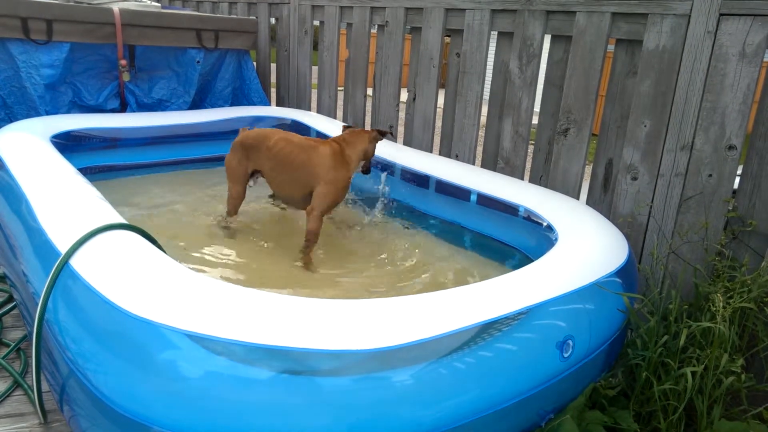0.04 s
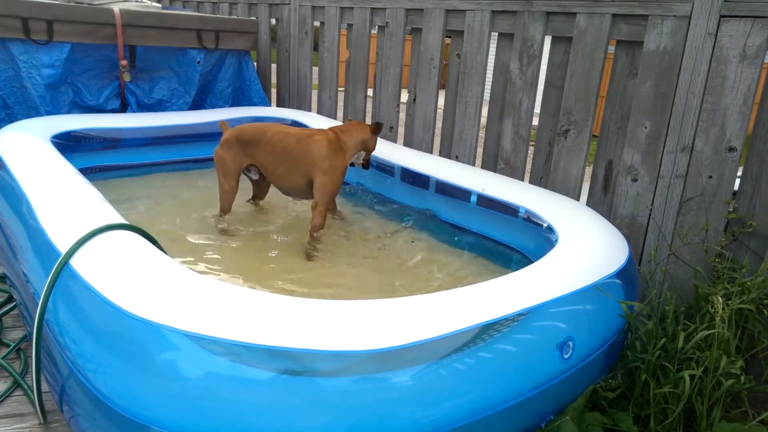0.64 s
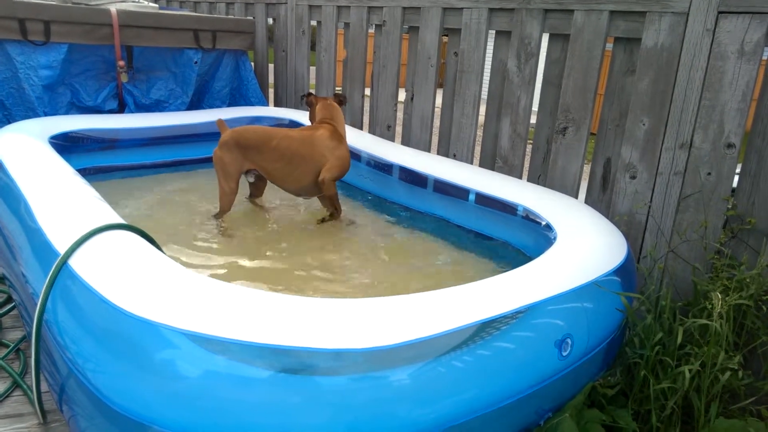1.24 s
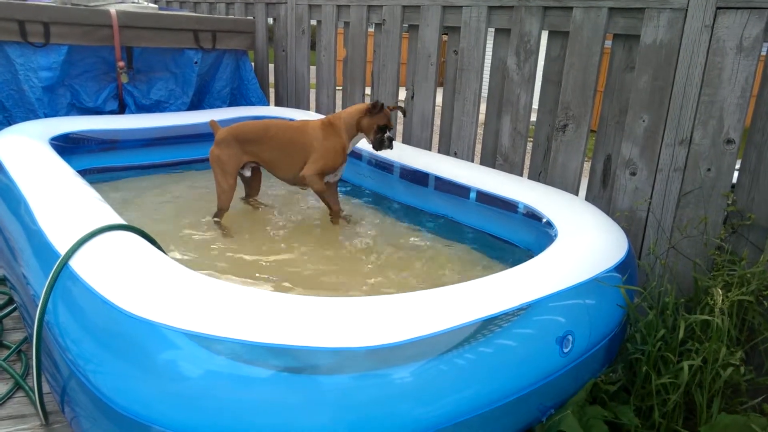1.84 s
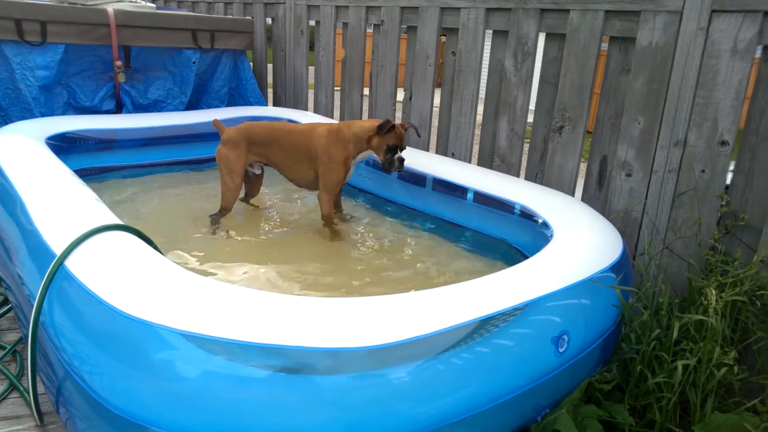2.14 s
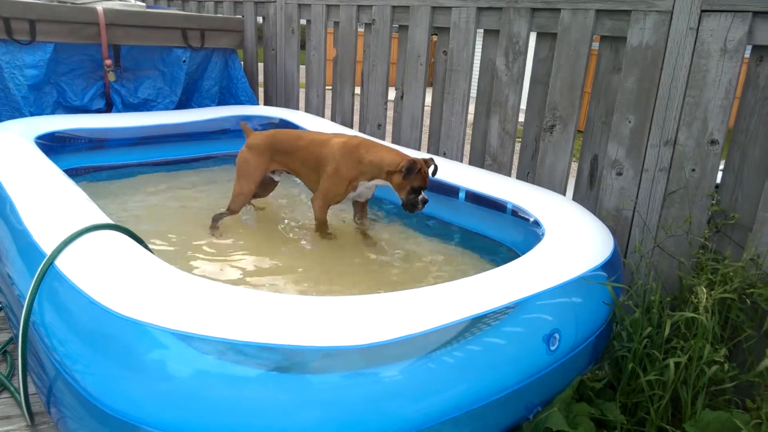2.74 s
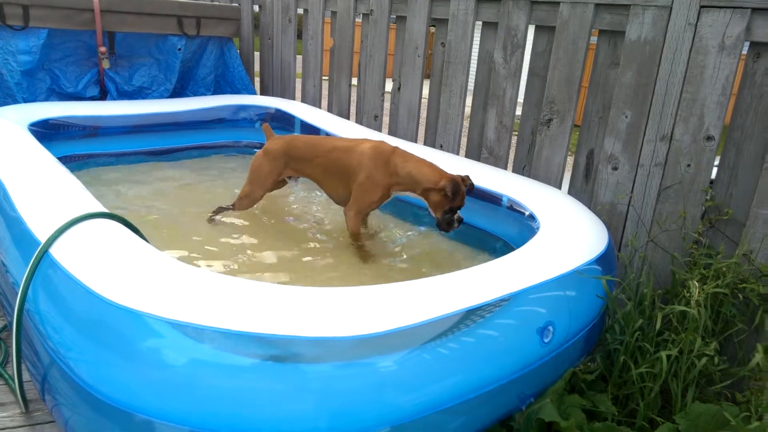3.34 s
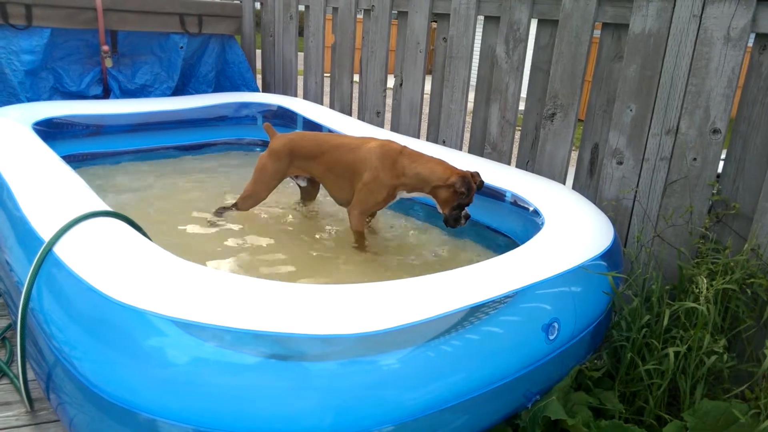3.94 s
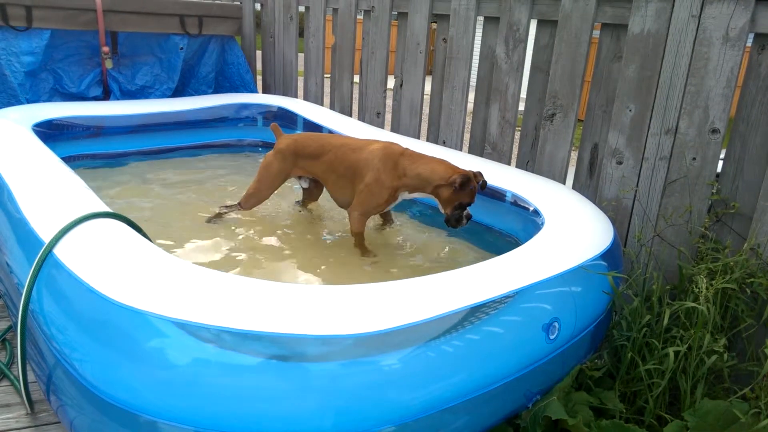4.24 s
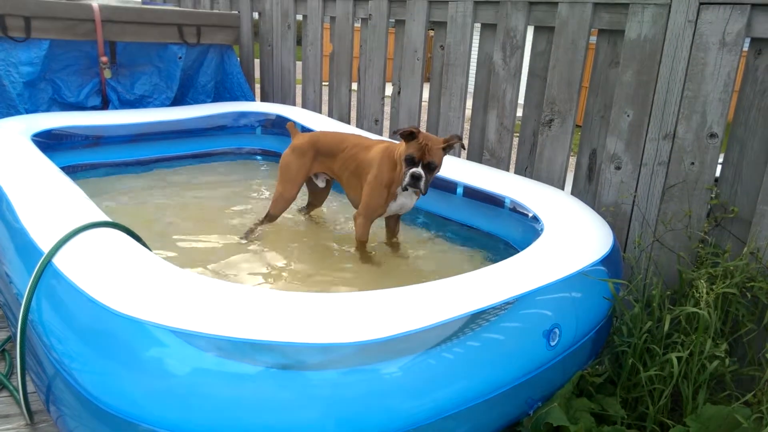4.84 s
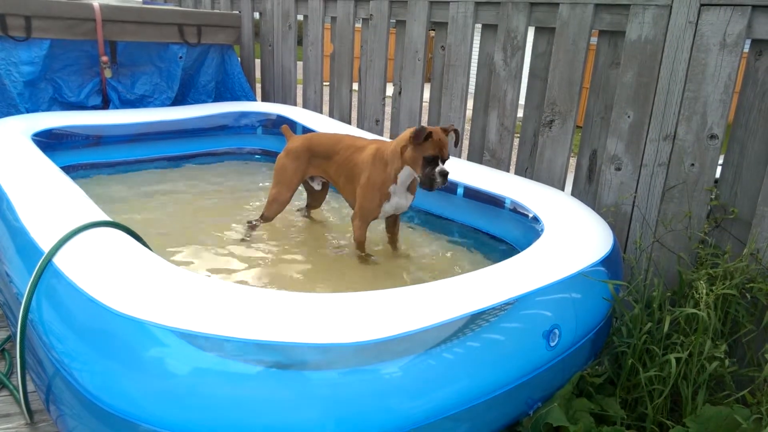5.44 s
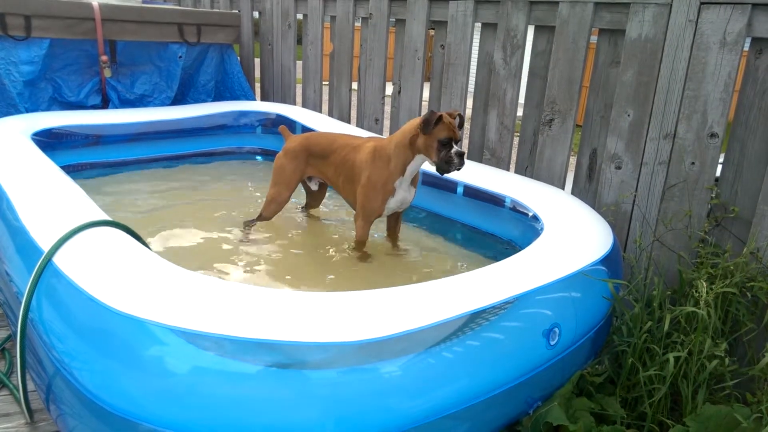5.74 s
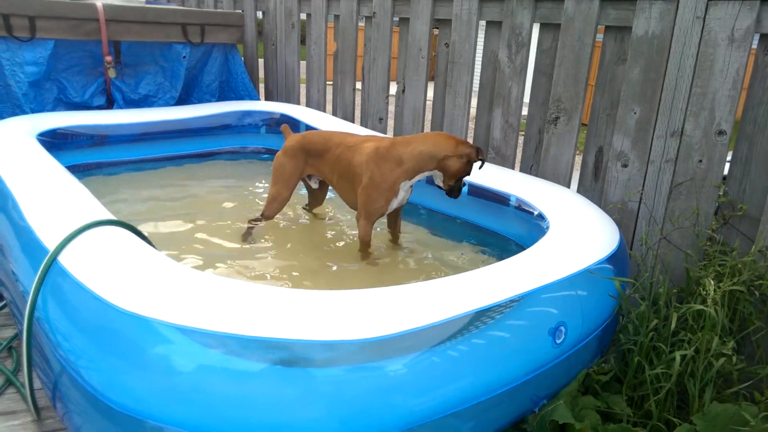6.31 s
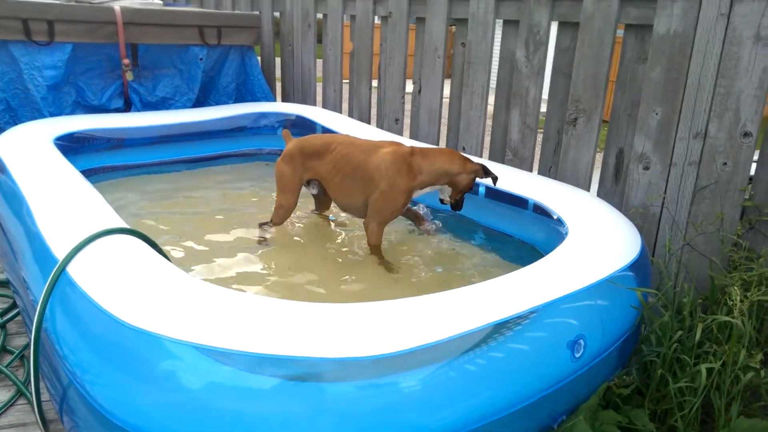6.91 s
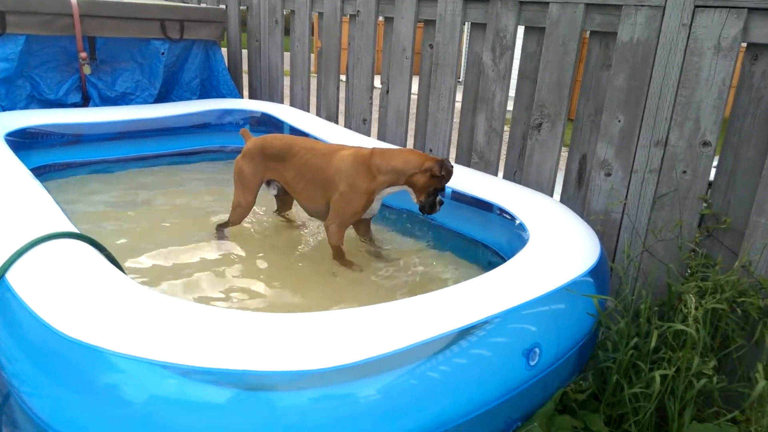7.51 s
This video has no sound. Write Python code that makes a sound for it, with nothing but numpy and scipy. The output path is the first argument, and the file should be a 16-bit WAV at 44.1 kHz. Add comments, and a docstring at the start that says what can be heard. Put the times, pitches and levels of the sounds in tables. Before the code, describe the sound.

Water sloshes, plips and patters in brief bursts as a dog steps around a paddling pool, with a faint breeze behind.

```python
"""A dog in a paddling pool

A dog wades and paws in a shallow inflatable pool beside a wooden fence, a few metres away.
Its strokes slap the surface, trap ringing air bubbles and throw a spray that patters back.
Behind it lie the quiet hum of a back yard and a light breeze that thuds on the microphone."""
import sys
import numpy as np
from scipy import signal
from scipy.fft import rfft, irfft, next_fast_len
from scipy.io import wavfile
from scipy.ndimage import map_coordinates

SR = 44100
rng = np.random.default_rng(int(sys.argv[2]) if len(sys.argv) > 2 else 0)


def materialize(psi):
    """Save the field psi as 16-bit PCM at rate SR to the path in sys.argv[1].

    A 1-D psi becomes a single channel; in a 2-D psi each row is a channel.
    """
    bounded = np.clip(np.atleast_2d(psi).T, -1, 1)
    quanta = np.round(bounded * 32767).astype(np.int16)
    wavfile.write(sys.argv[1], SR, quanta)


N = 333837


def amp(db):
    """Turn decibels into a gain."""
    return 10 ** (np.asarray(db) / 20)


def unit(x):
    """Scale a sound so that its average level (rms) is 1."""
    return x / np.sqrt(np.mean(x ** 2) + 1e-20)


def along(points, hz):
    """Read a table of (pitch_hz, value) rows at any pitch, on a log scale."""
    pitches, values = np.transpose(points)
    return np.interp(np.log(hz + 1), np.log(pitches + 1), values)


def wobble(per_s):
    """A smooth curve through per_s random points a second."""
    points = rng.standard_normal(int(N * per_s / SR) + 4)
    return map_coordinates(points, [np.arange(N) * per_s / SR])


def filtered(x, gain_at):
    """Turn each frequency of x up or down by gain_at(hz)."""
    n = x.shape[-1]
    padded = next_fast_len(n + 4096)
    return irfft(rfft(x, padded) * gain_at(np.fft.rfftfreq(padded, 1 / SR)), padded)[..., :n]


def hump(centre_hz, width_hz):
    """A filter that favours the pitches around a centre."""
    return lambda hz: 1 / (1 + (2 * (hz - centre_hz) / width_hz) ** 2)


def edge(ratio):
    """The gain of a steep filter that closes as the ratio passes 1."""
    return 1 / np.sqrt(1 + ratio ** 8)


def sides(left_over_right_db):
    """Left and right gains for a level difference."""
    gains = amp(np.array([[.5], [-.5]]) * left_over_right_db)
    return gains / gains.mean(axis=0)


def spread(pair, likeness):
    """Blend two unrelated signals into left and right: likeness 1 is identical, 0 is unrelated."""
    turn = lambda hz: np.arccos(np.clip(along(likeness, hz), -1, 1)) / 2
    mid, side = filtered(pair, lambda hz: np.array([np.cos(turn(hz)), np.sin(turn(hz))]))
    return np.array([mid + side, mid - side])


def coloured(pair, tone, likeness):
    """Stereo sound of level 1, shaped by a tone table."""
    return unit(spread(filtered(pair, lambda hz: amp(along(tone, hz))), likeness))


def add(track, start_s, sound):
    """Mix a stereo sound into the track."""
    start = max(0, round(start_s * SR))
    track[:, start:start + sound.shape[1]] += sound[:, :max(0, N - start)]


def ring(t, hz, fade_s, rise, attack_s):
    """A bubble's tone, rising as it nears the surface. Here and below, fade_s is the time to drop 60 dB."""
    cycles = hz * (t + rise * t * t / (2 * fade_s))
    return np.sin(2 * np.pi * cycles) * amp(-60 * t / fade_s) * (1 - np.exp(-t / attack_s))


# How the breeze grows and eases: time_s, relative_level_db
BREEZE_LEVELS = [(0.3, -63.5), (1.92, -65.5), (4.71, -60.5), (5.18, -61.5), (5.36, -59), (5.75, -63.5),
                 (7.16, -63), (7.57, -65)]
# The tone of each steady noise: pitch_hz, relative_level_db
BREEZE_TONE = [(20, -1), (35, -15), (60, 0.5), (100, -0.5), (160, -5.5), (250, -10), (400, -28),
               (800, -47.5)]
HUM_TONE = [(100, -18), (250, 1), (380, 0), (500, 1), (650, -4), (820, -0.5), (940, 0.5), (1100, -2),
            (2000, -11.5), (3500, -17), (8000, -21)]
HISS_TONE = [(800, -20), (2000, 4), (4000, 3), (8000, 0.5), (12000, -2), (15500, -11.5)]
# How alike the yard sounds on the left and right: pitch_hz, likeness
YARD_LIKENESS = [(50, 0.91), (130, 0.86), (290, 0.8), (640, 0.33), (1400, 0), (15000, 0)]

def background():
    """Breeze rumbling on the microphone, the far hum of the neighbourhood and a thin hiss."""
    breeze_db = np.interp(np.arange(N) / SR, *np.transpose(BREEZE_LEVELS))
    noise = lambda tone: coloured(rng.standard_normal((2, N)), tone, YARD_LIKENESS)
    breeze = amp(breeze_db + 2.12 + 0.9 * wobble(7.9)) * noise(BREEZE_TONE) * sides(-5)
    hum = amp(-65 + 0.28 * wobble(2.4)) * noise(HUM_TONE) * sides(-4)
    hiss = amp(-72) * noise(HISS_TONE) * sides(-3.5)
    return breeze + hum + hiss


# One paw on the pool floor, then gusts: start_s, pitch_hz, level_db, fade_s, left_over_right_db
LOW_THUDS = [(0.134, 123, -33, 0.074, -3), (1.352, 63, -48, 0.14, 20), (4.824, 55.5, -44, 0.11, -28),
             (5.425, 73, -36.5, 0.093, -34), (5.477, 81, -46, 0.18, -22), (5.564, 90, -26, 0.028, -30),
             (6.011, 69.6, -41.5, 0.054, -16), (6.307, 49, -47, 0.23, -21)]

def thuds(puff=0.17, attack_s=0.0015):
    """A paw on the floor or a gust on the microphone gives a few slow swings and a dull puff."""
    track, t = np.zeros((2, N)), np.arange(SR // 4) / SR
    for start_s, hz, db, fade_s, pan_db in LOW_THUDS:
        air = unit(filtered(rng.standard_normal(len(t)), lambda f: 1 / (1 + (f / 280) ** 4)))
        push = np.sin(2 * np.pi * hz * t) + puff * air
        shape = amp(-60 * t / fade_s) * (1 - np.exp(-t / attack_s))
        add(track, start_s, amp(db) * sides(pan_db) * push * shape)
    return track


# Faint swishes, some almost whistling: start_s, length_s, pitch_hz, width_hz, relative_level_db
FAINT_SWISHES = [(1.14, 0.14, 4100, 500, -71), (1.14, 0.12, 1800, 400, -64), (1.29, .13, 4430, 600, -71.5),
                 (1.576, 0.44, 3550, 700, -71), (2.161, 0.13, 1170, 700, -67.5),
                 (2.841, .17, 5600, 1800, -69.5), (3.283, 0.19, 6740, 600, -77),
                 (4.099, .14, 940, 300, -68), (4.407, .07, 864, 110, -58.5), (6.76, 0.18, 3350, 450, -74)]

def swishes():
    """Thin bands of hiss swell and fade between the splashes."""
    track = np.zeros((2, N))
    for start_s, length_s, hz, width_hz, db in FAINT_SWISHES:
        n = int(length_s * SR)
        hiss = unit(filtered(rng.standard_normal((2, n)), hump(hz, width_hz)))
        swell = np.sin(np.pi * np.arange(n) / n)
        add(track, start_s, amp(db + 2.5) * sides(-5) * hiss * swell)
    return track


# How long the echo of fence and house lasts: pitch_hz, fade_s
ECHO_FADES = [(200, 0.29), (1500, 0.22), (5000, 0.36), (14000, 0.051)]
# How alike the water and its echo sound on the left and right: pitch_hz, likeness
WATER_LIKENESS = [(200, 1), (700, 0.55), (1400, 0.4), (3100, 0.092), (7000, 0.046), (15000, 0.057)]

def echoes(x, early_db=-10, tail_db=-15, spread_s=.02, count=8):
    """Pool walls and fence throw back a few quick copies, then a faint tail."""
    hz, t, bands = signal.stft(rng.standard_normal((2, SR // 3)), SR, nperseg=256)
    fading = amp(-60 * t / along(ECHO_FADES, hz)[:, None])
    tail = signal.istft(bands * fading, SR, nperseg=256)[1]
    response = amp(tail_db) * np.pad(tail / np.linalg.norm(tail[0]), ((0, 0), (SR // 100, 0)))
    for channel in response:
        delays = ((.002 + spread_s * rng.random(count)) * SR).astype(int)
        channel[delays] += amp(early_db) * rng.choice([-1, 1], count) / np.sqrt(count)
    return signal.fftconvolve(x, spread(response, WATER_LIKENESS), axes=1)[:, :N]


def stray_drops(spray_db, low_hz=2480, high_hz=11600, scatter_db=8, fall_s=.015, count=260):
    """Rows for drips(): drops flung at random, louder (up to a limit) when more spray is flying."""
    when, pitch, lightness = rng.random((count, 3)).T
    hz = low_hz * (high_hz / low_hz) ** pitch
    heaviest_db = np.minimum(spray_db[(when * N).astype(int)] + 12, -36)
    return np.transpose([when * N / SR + fall_s, hz, heaviest_db - scatter_db * lightness])


# The loudest drops landing on water, vinyl and fur: start_s, pitch_hz, relative_level_db
LOUD_DROPS = [(0.3074, 2960, -36.5), (0.3478, 13400, -39), (0.4235, 6100, -33.5), (0.5653, 2530, -38),
              (0.6504, 12900, -27), (0.7645, 7350, -44), (1.0228, 6660, -51.5), (1.0583, 10500, -51),
              (1.1452, 2140, -32.5), (2.4686, 2820, -47), (2.4733, 7400, -49.5), (2.5239, 9150, -43.5),
              (2.5738, 2780, -49), (2.732, 2130, -35), (3.1586, 3400, -46), (3.3969, 5400, -51),
              (3.6383, 3620, -40), (3.84, 2400, -33), (3.8475, 12200, -36.5), (3.9717, 12400, -47.5),
              (4.5665, 3700, -51), (4.9667, 6160, -45.5), (5.884, 10300, -50.5), (6.1276, 4870, -56),
              (6.2357, 2750, -54), (6.9148, 5030, -47), (6.9745, 5700, -43), (7.0159, 11400, -41),
              (7.035, 2380, -29), (7.0355, 7400, -23.5), (7.1871, 7300, -37), (7.311, 2900, -41.5)]

def drips(rows, cycles=14, splatter_db=-12, splatter_fade_s=0.029):
    """A drop smacks for a few cycles, then its splatter scatters for a moment."""
    track, t = np.zeros((2, N)), np.arange(SR // 20) / SR
    for start_s, hz, db in rows:
        left_right_hz = hz * np.exp(0.024 * rng.standard_normal((2, 1)))
        smack = ring(t, left_right_hz, cycles / hz, rise=0, attack_s=0.61 / hz)
        noise = filtered(rng.standard_normal((2, len(t))), hump(hz, 0.83 * hz))
        shape = amp(splatter_db - 60 * t / splatter_fade_s) * (1 - np.exp(-t * hz / 2))
        splatter = unit(spread(noise, WATER_LIKENESS)) * shape
        add(track, start_s, amp(db + 2) * (smack / np.abs(smack).max() + splatter))
    return track


# A leg sweeping through the water: start_s, length_s, bubbling_db, spray_over_bubbling_db
LEG_STROKES = [(0.0, 0.0071, -39, -7.5), (0.055, 0.097, -40.5, -13.5), (0.121, 0.55, -39.5, -4.5),
               (0.422, 0.087, -45, -6.5), (0.583, 0.23, -57, -1.5), (1.145, .06, -56.5, -2.5),
               (1.985, 0.0082, -60, -6.5), (2.511, .05, -56, -10), (2.586, 0.086, -50, -11),
               (2.666, 0.077, -51, -2.5), (2.872, 0.14, -58.5, -9), (2.993, 0.063, -53, -11),
               (3.146, 0.008, -57.5, 0), (3.224, 0.094, -60, -7.5), (3.633, 0.041, -51, -12),
               (3.75, 0.12, -48, -6), (3.917, 0.045, -54.5, -10), (4.527, 0.012, -58, -19),
               (6.93, 0.08, -58, -8), (7.066, 0.076, -47, -9), (7.14, 0.016, -45.5, 0.5),
               (7.226, 0.17, -62, -3), (7.445, .025, -63.5, -2)]

def stirring(swell_db_per_s=500, sag_db_per_s=34.5, settle_db_per_s=230):
    """Bubbling and spray levels: each stroke swells, sags while the leg moves, then settles to ripples."""
    bubbling, spray = np.zeros((2, N))
    for start_s, length_s, db, spray_over_db in LEG_STROKES:
        t = np.arange(N) / SR - start_s
        before, since, after = np.clip(-t, 0, 1), np.maximum(t, 0), np.maximum(t - length_s, 0)
        stroke = amp(-sag_db_per_s * since - settle_db_per_s * after)
        ripples = amp(-28 - 5 * since)  # quiet lapping that lingers in the pool
        power = amp(db - swell_db_per_s * before) ** 2 * (stroke ** 2 + ripples ** 2)
        bubbling += power
        spray += power * amp(spray_over_db) ** 2
    return 10 * np.log10(bubbling), 10 * np.log10(spray)


def swarm(low_hz, high_hz, cycles, rise, scatter_db, count, samples):
    """Thousands of small bubbles ring at random moments; the higher ones die sooner."""
    when, pitch, life, strength = rng.random((4, count, 1))
    hz = low_hz * (high_hz / low_hz) ** pitch
    t = np.arange(samples) / SR
    fade_s = np.minimum(cycles * (.5 + life) / hz, samples / SR)
    gain = amp(scatter_db * np.minimum(-np.log(1 - strength), np.pi)) * hz / low_hz  # a few stand out
    plips = gain * ring(t, hz, fade_s, rise, attack_s=.5 / hz)
    where = (when * N).astype(int) + np.arange(samples)
    return unit(np.bincount(where.ravel(), plips.ravel(), N)[:N])


# The tone of stirred water and of falling spray: pitch_hz, relative_level_db
BUBBLING_TONE = [(150, -50), (300, -20.5), (480, -2.5), (700, -6), (950, 2), (1180, -3), (1450, 4.5),
                 (2000, -0.5), (2800, -3.5), (3600, -7.5), (6000, -32)]
SPRAY_TONE = [(1500, -2.5), (3000, -8), (4200, 5.5), (7500, -1.5), (8500, -5), (11000, -3.5), (15500, -9.5)]

def churn(bubbling_db, spray_db):
    """Stirred water: low bubbling and the high patter of falling spray, both on a wash of noise."""
    froth = [swarm(350, 4000, cycles=46, rise=.1, scatter_db=3.2, count=2800, samples=1700)
             for _ in range(2)]
    drops = [swarm(3000, 15000, cycles=45, rise=.05, scatter_db=4.5, count=9000, samples=500)
             for _ in range(2)]
    froth = coloured(np.array(froth) + 2 * rng.standard_normal((2, N)), BUBBLING_TONE, WATER_LIKENESS)
    drops = coloured(np.array(drops) + 1.7 * rng.standard_normal((2, N)), SPRAY_TONE, WATER_LIKENESS)
    clumps_db = 2.7 * wobble(90)  # water lands in clumps
    return amp(bubbling_db + clumps_db - 1) * froth + amp(spray_db + clumps_db) * drops


# The larger trapped bubbles: start_s, rough_pitch_hz, relative_level_db, pitch_rise (0.5 is half again)
BIG_BUBBLES = [(0.017, 1886, -32, 0.81), (0.094, 409, -29.5, 0.058), (0.111, 520, -24, 0),
               (0.127, 560, -29.5, 0.19), (0.131, 890, -22.5, 0), (0.136, 220, -47, 0.011),
               (0.136, 1560, -21, 0.33), (0.144, 956, -26, 0.092), (0.206, 930, -38, 0.17),
               (0.241, 1442, -39, 0.26), (0.259, 1750, -41, .44), (0.324, 1704, -35.5, .13),
               (0.358, 1360, -44, .32), (0.467, 1020, -45, 0.55), (0.563, 2050, -37.5, 0.71),
               (0.649, 643, -48.5, .46), (0.745, 1320, -48.5, .2), (0.746, 2380, -42.5, 0.45),
               (0.778, 950, -43, .26), (1.247, 1277, -41.5, 1), (1.998, 1605, -47, 0),
               (2.471, 2850, -49, 0.33), (2.505, 1730, -44, 0.17), (2.524, 2260, -44, 0.043),
               (2.586, 1734, -42.5, 0.39), (2.649, 349, -38, 0.4), (2.665, 427, -37.5, 0.36),
               (2.667, 1800, -30.5, 0.15), (2.708, 1387, -31, 0.07), (2.73, 1494, -31.5, 0.069),
               (2.996, 1736, -38, 0.23), (3.019, 2100, -36.5, 0.17), (3.146, 1460, -41, 0.48),
               (3.17, 900, -41.5, 0.21), (3.208, 555, -46, 1.24), (3.24, 2050, -41, 0.045),
               (3.632, 1440, -44, 0.027), (3.635, 893, -46, 0.33), (3.739, 426, -39, 0.48),
               (3.75, 933, -40.5, 0.2), (3.766, 588, -40, 0.55), (3.796, 812, -41.5, 0.019),
               (3.839, 2470, -37, 0.14), (3.87, 1360, -38.5, 0.18), (4.437, 1370, -51.5, .2),
               (6.914, 1590, -53.5, 0.039), (6.962, 2130, -41.5, 0.13), (7.072, 1525, -34.5, 0.35),
               (7.11, 580, -43.5, 0.14), (7.113, 2140, -36, 0), (7.148, 602, -30, 0.053),
               (7.16, 1310, -31, 0.43), (7.18, 2270, -33.5, .12), (7.317, 1033, -49, 1.3),
               (7.418, 2230, -37, 0.27)]

def bubbles(roughness=0.15, pinch_s=0.0048, waver=0.29):
    """Single plips and low gulps: loudest as the air pinches off, then shaken by the moving water."""
    track, t = np.zeros((2, N)), np.arange(SR // 5) / SR
    for start_s, hz, db, rise in BIG_BUBBLES:
        fade_s = .055 * (1000 / hz) ** 0.48 * (1 + .9 * rise)  # big or rising bubbles ring longer
        shake = unit(filtered(rng.standard_normal((3, len(t))), lambda f: 1 / (1 + (f * 6 / hz) ** 2)))
        shaken_t = t + waver * shake[2] / (2 * np.pi * hz)
        tone = ring(shaken_t, hz * .98, fade_s, rise, attack_s=1 / hz)  # big bubbles start softly
        tone *= (1 + 0.5 * np.exp(-t / pinch_s)) * np.minimum(t * hz, 1)
        flutter = 1 + roughness * shake[:2]
        add(track, start_s, amp(db - 2) * tone / np.abs(tone).max() * flutter)
    return track


# Paws and thrown water hitting the surface: start_s, pitch_hz, level_db, fade_s
SURFACE_SLAPS = [(0.01, 219, -46, 0.1), (0.045, 650, -42.5, 0.07), (0.091, 860, -32, 0.06),
                 (0.125, 1340, -25, 0.081), (0.128, 210, -40, 0.057), (0.253, 1580, -36, 0.043),
                 (0.303, 480, -49, 0.086), (0.561, 2600, -41, 0.026), (1.142, 2370, -39.5, 0.022),
                 (2.571, 2140, -46.5, .025), (2.662, 2370, -37, 0.042), (2.729, 2040, -43.5, 0.02),
                 (3.145, 2700, -58, .043), (3.152, 570, -51, 0.045), (3.63, 1600, -65, 0.015),
                 (3.737, 620, -46, 0.094), (3.838, 2400, -60, 0.031), (4.432, 1390, -61, 0.11),
                 (4.544, 2230, -52, 0.013), (7.028, 2320, -35.5, .042), (7.072, 1700, -44.5, 0.067),
                 (7.111, 2150, -41, 0.021), (7.13, 2400, -42, 0.057), (7.147, 890, -38, 0.046),
                 (7.158, 1500, -41, 0.033)]

def slaps(attack_s=0.00065, band_ratio=1.73, fizz_db=-20, fizz_top_hz=9700):
    """Each hit is a short burst of spattering water, duller the bigger the mass of water."""
    track, t = np.zeros((2, N)), np.arange(SR // 6) / SR
    for start_s, centre_hz, db, fade_s in SURFACE_SLAPS:
        low_hz, high_hz = centre_hz / band_ratio, centre_hz * band_ratio
        top = lambda hz: edge(hz / high_hz) + amp(fizz_db) * edge(hz / fizz_top_hz)
        band = lambda hz: edge(low_hz / (hz + 1)) * top(hz)
        burst = unit(spread(filtered(rng.standard_normal((2, len(t))), band), WATER_LIKENESS))
        shape = amp(-60 * t / fade_s) * (1 - np.exp(-t / (attack_s + 0.086 * fade_s))) ** 2
        add(track, start_s, amp(db) * burst * shape / shape.max())
    return track


# Which side of the microphone hears the water louder: pitch_hz, left_over_right_db
MIC_BALANCE = [(60, -13), (400, -3), (700, -6.5), (1300, 5), (2400, -2.5), (4400, -2.5), (8000, -1),
               (15000, 2)]

def scene():
    """The splashing water with its echoes, over the sounds of the yard."""
    bubbling_db, spray_db = stirring()
    water = churn(bubbling_db, spray_db) + slaps() + bubbles()
    water += drips(LOUD_DROPS) + drips(stray_drops(spray_db))
    water = filtered(water, lambda hz: sides(along(MIC_BALANCE, hz)))
    return water + echoes(water) + swishes() + thuds() + background()


def record(dry, top_hz=15900):
    """The very highest treble is cut away."""
    return filtered(dry, lambda hz: hz < top_hz)


dry = scene()
out = record(dry)
materialize(out)
```